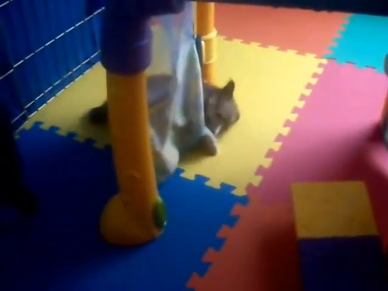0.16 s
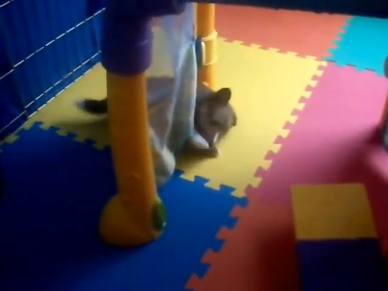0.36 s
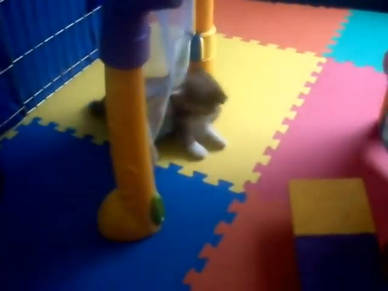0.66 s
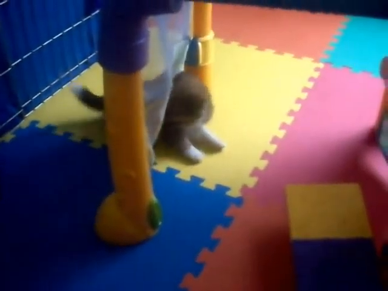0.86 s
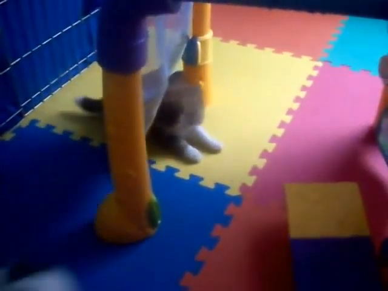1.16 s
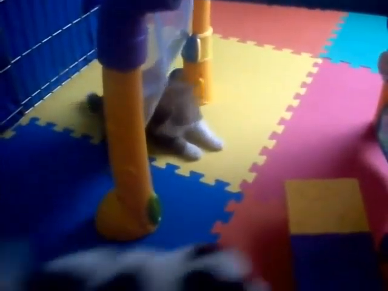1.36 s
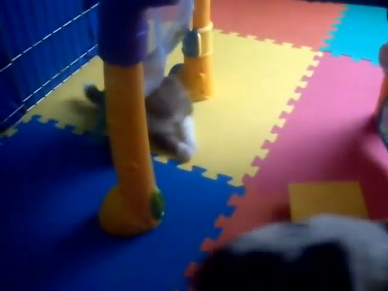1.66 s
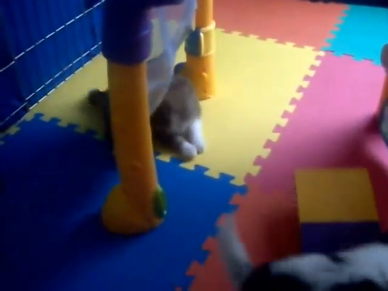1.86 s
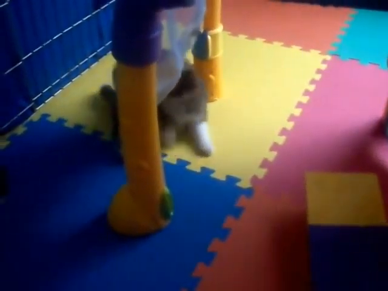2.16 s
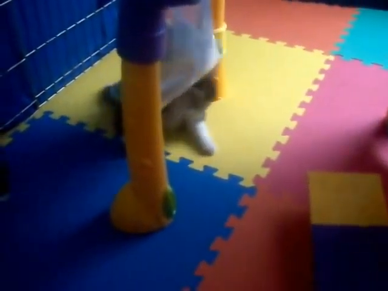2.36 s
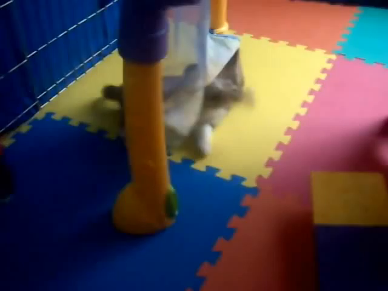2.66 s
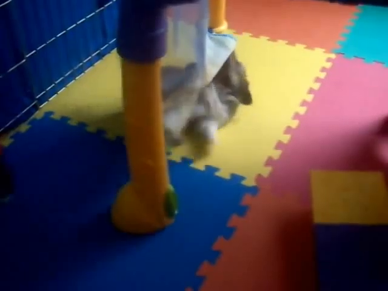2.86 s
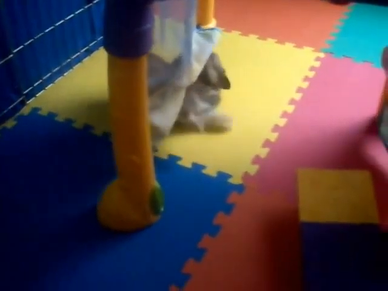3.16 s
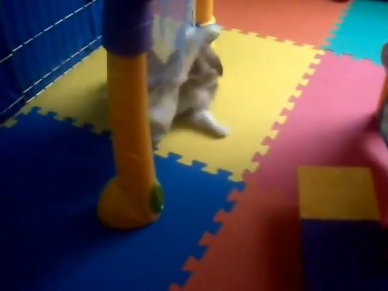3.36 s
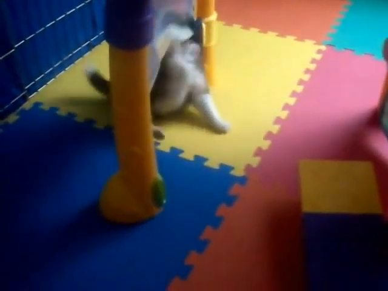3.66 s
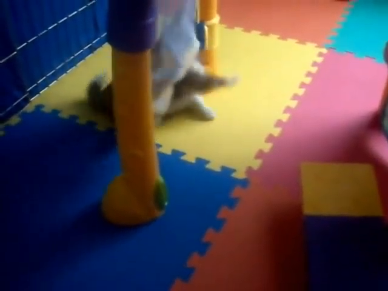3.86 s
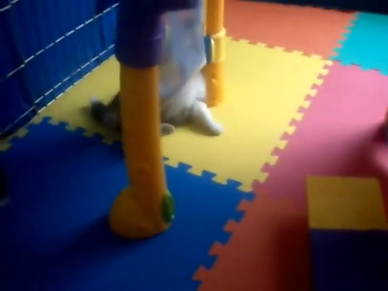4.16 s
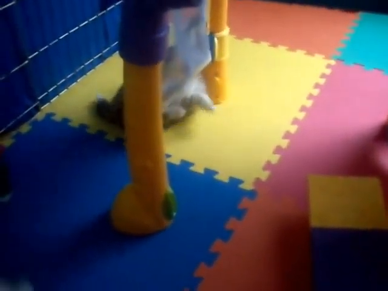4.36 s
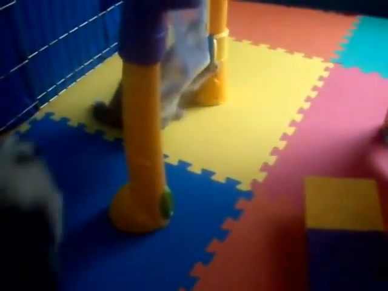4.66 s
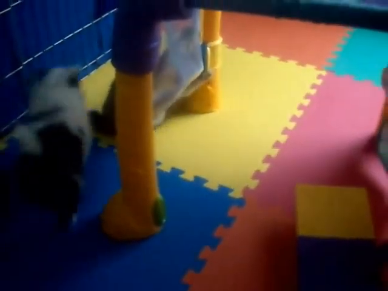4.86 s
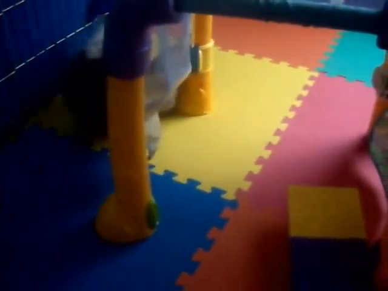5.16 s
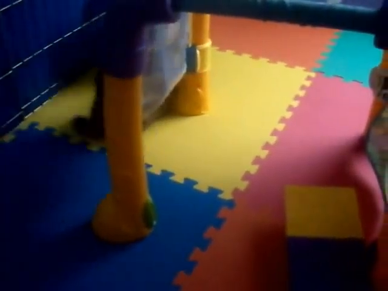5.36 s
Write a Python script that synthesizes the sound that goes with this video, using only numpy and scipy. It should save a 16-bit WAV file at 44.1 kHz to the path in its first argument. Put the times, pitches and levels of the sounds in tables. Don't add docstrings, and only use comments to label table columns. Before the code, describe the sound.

Puppies wrestle on foam mats in a bare, echoing room. Faint rustles and pats lead to a small metal clink and thin squeaks, then a hollow plastic toy is knocked twice, by far the loudest moment. Afterwards paws land, claws tick and scrape, and bodies bump softly. Steady airy hiss and a faint hum stay underneath, through a small camera microphone.

```python
import sys
import numpy as np
from scipy import signal
from scipy.fft import rfft, irfft
from scipy.io import wavfile
from scipy.ndimage import uniform_filter1d

SR = 44100
rng = np.random.default_rng(int(sys.argv[2]) if len(sys.argv) > 2 else 0)


def elevation(decibels):
    levels = np.asarray(decibels, float)
    return 10 ** (levels / 20)


def digitize_waveform(pressure):
    field = np.atleast_2d(pressure).T
    bounded = np.clip(field, -1, 1)
    quanta = np.round(bounded * 32767).astype(np.int16)
    wavfile.write(sys.argv[1], SR, quanta)


N = 242991
T = np.arange(N) / SR
LN_1000 = np.log(1000)
SHORT, LONG = 2000, 4000


def unit(x):
    return x / np.sqrt(np.mean(x ** 2))


def band(x, lo_hz, hi_hz):
    edges_hz = [lo_hz, min(hi_hz, SR / 2.1)]
    return signal.sosfilt(signal.butter(2, edges_hz, "band", fs=SR, output="sos"), x)


def add(out, start_s, x):
    i = max(int(start_s * SR), 0)
    out[i:i + len(x)] += x[:N - i]


def walk(rate_hz):
    hold = int(SR / rate_hz)
    steps = np.resize(np.repeat(rng.standard_normal(SHORT), hold), N)
    return uniform_filter1d(uniform_filter1d(steps, hold), hold)


def swells(strokes):
    t = T[::16]
    power = 0
    for peak_s, db, rise_s, fall_s in strokes:
        away = np.maximum((peak_s - t) / rise_s, (t - peak_s) / fall_s)
        power = power + elevation(2 * db - 40 * away)
    return np.interp(T, t, np.sqrt(power))


# f/Hz, level/dB
AIR = [(12, -24), (22, 2.5), (284, -7.5), (600, -1), (1180, -2), (2250, -9.5), (5810, -16.5),
       (15000, -20.5)]
# f/Hz, width/octaves, level/dB
AIR_DIPS = [(32.2, 0.66, -1.5), (199, 0.31, -8.5), (610, 0.015, -3), (1730, 0.11, -22)]
# f/Hz, level/dB
APPLIANCES = [(120, -98), (240, -80), (642, -72)]


def house():
    hz = np.fft.rfftfreq(N, 1 / SR) + 1
    dips_db = sum(db * np.exp(-(np.log2(hz / f) / width) ** 2) for f, width, db in AIR_DIPS)
    air_hz, air_db = np.transpose(AIR)
    shape = elevation(np.interp(np.log(hz), np.log(air_hz), air_db) + dips_db)
    air = unit(irfft(rfft(rng.standard_normal(N)) * shape, N))
    out = elevation(-63 + 0.32 * walk(1.66)) * air
    for f, db in APPLIANCES:
        out += elevation(db + 2 * walk(12)) * np.sqrt(2) * np.sin(2 * np.pi * f * T)
    return out


# f/Hz, t60/s, level/dB
ECHOES = [(85, 0.35, 2), (236, 0.6, -1), (464, 0.44, 1), (1000, 0.46, 3), (1836, 0.61, -0.5),
          (3700, 0.52, -0.5), (7600, 0.59, -1.5), (14600, 0.65, -3)]


def room(x):
    t = T[:SR]
    tail = np.zeros(SR)
    for hz, t60_s, db in ECHOES:
        noise = band(rng.standard_normal(SR), hz / 1.335, hz * 1.52)
        tail += elevation(db) * noise * np.exp(-LN_1000 * t / t60_s)
    tail *= np.clip((t - .004) / 0.0035, 0, 1)
    return elevation(-3) * signal.fftconvolve(x, tail / np.sqrt(np.sum(tail ** 2)))[:N]


def ring(hz, t60_s, length_s):
    t = np.arange(int(length_s * SR)) / SR
    return np.sin(2 * np.pi * hz * t) * np.exp(-LN_1000 * t / t60_s)


def struck(blows, modes, bursts, slap):
    rings, rest = np.zeros(N), np.zeros(N)
    body = sum((-1) ** k * elevation(db) * ring(hz, t60_s, .6) for k, (hz, db, t60_s) in enumerate(modes))
    slap_hz, slap_db, slap_t60_s, send_db = slap
    smack = ring(slap_hz, slap_t60_s, .02)
    smack = smack * np.minimum(T[:len(smack)] * slap_hz, 1)
    for s, db, contact_ms, crack_db in blows:
        push = np.sin(np.pi * np.arange(0, 1, 1000 / (contact_ms * SR)) + .01)
        push = push / push.sum()
        add(rings, s, elevation(db) * np.convolve(body, push) / 2)
        add(rest, s, elevation(db + slap_db) * np.convolve(smack, push) / 2)
        for (lo_hz, hi_hz, burst_db, fade_ms), extra_db in zip(bursts, (0, crack_db, crack_db)):
            noise = unit(band(rng.standard_normal(SHORT), lo_hz, hi_hz))
            add(rest, s, elevation(db + burst_db + extra_db) * noise * np.exp(-T[:SHORT] * 1000 / fade_ms))
    return np.array([rings + rest, elevation(send_db) * rings + rest])


# t/s, level/dB, contact/ms, crack/dB
PANEL_BLOWS = [
    (3.9945, -44.5, 0.053, -4),
    (3.9965, -35.5, 0.041, -6),
]
# f/Hz, level/dB, t60/s
PANEL_MODES = [(2100, -2, 0.041), (3220, -3, 0.08), (4050, 1, 0.013), (4940, -12, 0.066), (5880, -9, 0.034),
               (8240, 0, 0.012), (9260, -3, 0.018)]
# low f/Hz, high f/Hz, level/dB, fade/ms
PANEL_BURSTS = [(1790, 5700, -10, 3.2), (5050, 12000, -15, 1.9)]
# f/Hz, level/dB, t60/s, ringing sent to room/dB
PANEL_SLAP = (3000, -8, .003, -5)


def wire_panel():
    return struck(PANEL_BLOWS, PANEL_MODES, PANEL_BURSTS, PANEL_SLAP)


# t/s, level/dB, contact/ms, crack/dB
LATCH_BLOWS = [
    (.4014, -29.5, 0.035, -2.5),
]
# f/Hz, level/dB, t60/s
LATCH_MODES = [(1080, -8, .04), (2040, 0, .03), (2800, -2, .008), (3520, -17, .05), (4727, -18, .05),
               (5500, -18, .04), (7200, -15, .03), (8000, -15, .14)]
# low f/Hz, high f/Hz, level/dB, fade/ms
LATCH_BURSTS = [(410, 3200, -19.5, 18), (1890, 9600, -15.5, 8.9), (10980, 15300, -20.5, 12)]
# f/Hz, level/dB, t60/s, ringing sent to room/dB
LATCH_SLAP = (2500, 0, .006, -6)


def metal_latch():
    return struck(LATCH_BLOWS, LATCH_MODES, LATCH_BURSTS, LATCH_SLAP)


# t/s, level/dB, contact/ms, crack/dB
FIRST_KNOCK = [
    (1.8434, -18.5, 0.42, -18),
    (1.8475, -27, 0.95, -23),
    (1.880, -24.5, 0.38, -33),
    (1.8845, -27, 0.47, -20),
    (1.8905, -28, 0.57, -30),
]
SECOND_KNOCK = [
    (2.0214, -24.5, 0.38, -8.5),
    (2.0226, -21, 0.26, -13.5),
    (2.0265, -22.5, 0.4, -27),
    (2.0302, -15, 0.44, -31),
    (2.0395, -34, 0.24, -22),
    (2.050, -24, 0.33, -33),
    (2.083, -26, 0.2, -25),
]
# f/Hz, level/dB, t60/s
FIRST_MODES = [(151, -13, 0.059), (284, -23, 0.11), (333, -6.5, 0.14), (479, -7, .27), (581, 5, 0.041),
               (742, -1.5, 0.057), (875, -0.5, 0.055), (980, -18, 0.1), (1090, -9, 0.086),
               (1340, -6, 0.049), (1463, -2, 0.11), (2030, -10, 0.073), (2470, -1, 0.058),
               (3900, -7, 0.024)]
SECOND_MODES = [(90, -14.5, 0.067), (267, -12, 0.036), (326, -13, 0.16), (479, -13, .36), (587, -19, 0.051),
                (790, 3.5, 0.022), (885, -1.5, 0.066), (1060, -4, 0.037), (1180, 5.5, 0.024),
                (1300, -3.5, 0.039), (1501, -3, 0.12), (1818, -14, 0.041), (2070, -11, 0.06),
                (2400, -1.5, 0.017)]
# low f/Hz, high f/Hz, level/dB, fade/ms
FIRST_BURSTS = [(260, 1450, -8, 6.1), (1600, 5400, -2.5, 4.4), (9100, 18000, -17, 3.9)]
SECOND_BURSTS = [(392, 1170, -6, 4.8), (1590, 3400, -4, 3.9), (8000, 19000, -18, 5)]
# f/Hz, level/dB, t60/s, ringing sent to room/dB
FIRST_SLAP = (820, 18, .0055, -5)
SECOND_SLAP = (900, 12.5, .006, -4)


def hollow_toy():
    first = struck(FIRST_KNOCK, FIRST_MODES, FIRST_BURSTS, FIRST_SLAP)
    second = struck(SECOND_KNOCK, SECOND_MODES, SECOND_BURSTS, SECOND_SLAP)
    return band(first + second, 100, 18000)


# t/s, length/s, first f/Hz, last f/Hz, level/dB
PAD_SQUEAKS = [
    (-.03, 0.13, 2370, 2390, -65),
    (0.797, 0.038, 2325, 2335, -63.5),
    (0.835, 0.075, 2380, 2560, -65),
    (0.895, 0.085, 2550, 2565, -57.5),
]


def squeaks():
    out = np.zeros(N)
    roughness = .35
    for s, length_s, first_hz, last_hz, db in PAD_SQUEAKS:
        way = np.clip((T - s) / length_s, 0, 1)
        glide_hz = first_hz + (last_hz - first_hz) * way
        turns = np.cumsum(glide_hz * (1 + .003 * walk(68))) / SR
        grip = 1 - roughness / 2 + roughness * walk(206)
        level = elevation(db + 2.5 * walk(50.5)) * grip * np.sin(np.pi * way)
        out += level * np.sqrt(2) * np.sin(2 * np.pi * turns)
    return out


# t/s, length/s, f/Hz, level/dB
PAD_RASPS = [
    (0.872, 0.038, 2860, -61),
    (3.256, 0.046, 2450, -64),
    (2.291, 0.045, 2340, -59),
    (2.344, 0.12, 2390, -61),
    (3.349, 0.08, 770, -59),
]


def rasps():
    out = np.zeros(N)
    half_width_hz = 170
    for s, length_s, hz, db in PAD_RASPS:
        way = np.arange(0, 1, 1 / (length_s * SR))
        hiss = unit(band(rng.standard_normal(SR // 4), hz - half_width_hz, hz + half_width_hz))
        add(out, s, elevation(db) * np.sqrt(np.sin(np.pi * way)) * hiss[:len(way)])
    return out


def slip_grain():
    slips_per_s, spread_db = 3000, 3
    slips = (rng.random(N) < slips_per_s / SR) * elevation(spread_db * rng.standard_normal(N))
    return np.convolve(slips, np.exp(-T[:SHORT // 4] / .003))[:N]


def rubbing(grain, size, lo_hz, hi_hz):
    noise = band(grain * rng.standard_normal(N), lo_hz, hi_hz)
    noise = band(noise, lo_hz / 1.74, hi_hz * 1.2)
    return size * elevation(2.2 * walk(14)) * unit(noise)


# peak t/s, level/dB, rise/s, fall/s
FUR_STROKES = [(.05, -65, .5, 0.39), (.28, -65, 0.11, .16), (.385, -64, 0.065, 0.33),
               (.944, -69.5, 0.29, .06), (1.014, -66.5, .03, 0.26), (1.182, -65.5, .03, 1),
               (1.474, -62, .02, 0.048), (1.734, -60.5, 0.19, 0.18), (1.846, -54, .004, .05),
               (1.866, -49.5, .004, 0.045), (1.885, -53, .012, 0.059), (2.26, -63.5, 0.16, 0.083),
               (2.587, -55, .01, .02), (2.71, -61, .08, 0.11), (2.784, -54, .003, 0.014),
               (2.915, -63, .02, .02), (3.919, -55.5, .01, .025), (3.958, -55, .012, .02),
               (3.997, -54, .003, .012), (4.077, -60, .01, .02), (2.41, -66, 0.031, 0.95),
               (2.63, -57.5, 0.38, 0.35), (3.28, -65, 0.12, .2), (3.52, -63, 0.034, 0.37),
               (3.67, -58.5, 0.21, 0.099), (3.99, -63, 0.39, 0.2), (4.22, -60.5, 0.03, 0.11),
               (4.61, -65, 1.1, 0.26), (4.83, -63, 0.036, 0.051), (5.15, -66, 0.027, 0.076)]
# low f/Hz, high f/Hz, level/dB
CLOTH_NAP = (7360, 9460, -7.5)


def fur_and_cloth(grain):
    stroke = swells(FUR_STROKES)
    lo_hz, hi_hz, nap_db = CLOTH_NAP
    nap = rubbing(grain, stroke * elevation(nap_db), lo_hz, hi_hz)
    return nap + rubbing(grain, stroke, lo_hz=2780, hi_hz=15300)


# peak t/s, level/dB, rise/s, fall/s
BODY_SHOVES = [
    (.43, -51, 0.021, 0.24),
    (1.28, -58, .08, 0.14),
    (2.59, -53, 0.012, 0.21),
    (3.92, -58, 0.055, 0.17),
    (4.46, -65, 0.022, 0.13),
    (4.77, -61, 0.026, 0.16),
    (2.71, -53, 0.037, 0.063),
    (2.80, -59, 0.031, .15),
    (5.31, -63, .008, 0.12),
]
# peak t/s, level/dB, rise/s, fall/s
CLAW_DRAGS = [
    (1.175, -58, 0.0071, 0.14),
    (1.72, -71, 0.055, 0.15),
    (2.605, -62, 0.045, 0.28),
    (2.80, -67, .05, 0.18),
    (2.9, -65, 0.028, 0.092),
    (3.265, -62.5, .012, 0.13),
    (3.6, -58.5, 0.092, 0.26),
    (3.925, -56.5, 0.044, 0.3),
    (4.25, -55.5, 0.13, 0.11),
    (4.38, -67, 0.043, 0.22),
]
# t/s, effort/dB, claws out/dB
EFFORT = [(0, -57, -0.5), (.31, -75.5, 13), (.42, -71, 14), (.75, -64.5, -8), (1.05, -63.5, 4.5),
          (1.26, -59, -3), (1.44, -63, -7), (1.68, -64, 2.5), (1.83, -76, 15), (2.4, -58, -5),
          (2.66, -64, 1.5), (2.85, -54, -27), (3.04, -63, -5), (3.37, -72, 4), (3.55, -59.5, -14),
          (4.1, -66.5, 3.5), (4.6, -59, -8.5), (4.9, -65.5, -3)]


def wrestling(grain):
    s, effort_db, claws_db = np.transpose(EFFORT)
    effort_db, claws_db = np.interp(T, s, effort_db), np.interp(T, s, claws_db)
    weight = elevation(-73.5 + 0.19 * (effort_db + 55))
    rumble = rubbing(grain, weight, lo_hz=57.4, hi_hz=367)
    scuff = rubbing(grain, elevation(effort_db) + swells(BODY_SHOVES), lo_hz=394, hi_hz=1485)
    scrape = rubbing(grain, elevation(effort_db + claws_db) + swells(CLAW_DRAGS), lo_hz=1850, hi_hz=2910)
    return rumble + scuff + scrape


def contacts(rows, ring_ms, spread, tone, noisy):
    near, far, t = np.zeros(N), np.zeros(N), T[:LONG]
    fade = np.exp(-LN_1000 * t * 1000 / ring_ms)
    for s, db, hz, wet_db in rows:
        shape = elevation(db) * fade * np.minimum(t * hz / .9, 1)
        puff = unit(band(rng.standard_normal(LONG), hz / spread, hz * spread))
        dent = tone * np.sin(2 * np.pi * hz * t)
        add(near, s, shape * (dent + noisy * band(puff, hz / spread, hz * spread)))
        add(far, s, shape * puff * elevation(wet_db))
    return np.array([near, far])


# t/s, level/dB, f/Hz, room share/dB
FLOOR_BOOMS = [
    (1.86, -42, 80.5, -3),
    (2.05, -49.5, 86, -3),
    (2.10, -45, 90, -12.5),
    (2.69, -62.5, 74, 0),
    (4.05, -66, 75, -8),
]


def booms():
    return contacts(FLOOR_BOOMS, ring_ms=174, spread=1.18, tone=1.0, noisy=0.4)


# t/s, level/dB, f/Hz, room share/dB
CLAW_TICKS = [(0.8185, -47.5, 2730, -6), (0.8797, -61, 2730, -6), (.928, -46.5, 1700, -15),
              (1.174, -50, 2180, -12), (1.1847, -38.5, 2150, -11), (1.1956, -44, 2070, -16),
              (1.4097, -52, 2100, -2.5), (1.593, -53, 2100, 2), (1.7015, -43, 1850, -2.5),
              (2.2964, -41.5, 2240, -24), (2.5855, -45, 2640, -1.5), (2.602, -46, 2310, -21),
              (2.7673, -50, 2460, 9), (2.8943, -42.5, 2260, -2.5), (3.257, -52, 2400, -6),
              (3.268, -46.5, 2400, -6), (3.509, -47, 2200, -3.5), (3.5806, -50, 2130, 5),
              (3.9211, -48.5, 2210, -3.5), (4.067, -42, 2400, -27), (4.2449, -54, 2470, -2),
              (4.3584, -50, 2000, -0.5), (4.3811, -49, 1960, -14), (4.7466, -52, 2750, -14),
              (4.8149, -47, 2580, -12)]
CLAW_SNAPS = [(0.012, -63.5, 3960, 6.5), (0.189, -62, 3480, -13), (0.2498, -53, 3900, -6),
              (0.7165, -49.5, 3400, -17), (0.818, -55, 3740, -12), (1.008, -52.5, 3720, -9),
              (1.0191, -48.5, 3520, -13), (1.119, -52.5, 3700, -16), (1.174, -53.5, 4560, 4.5),
              (1.4083, -54, 3440, -9), (1.4743, -49, 3720, -12), (1.535, -56, 3560, -14),
              (1.637, -54.5, 4470, -13), (1.722, -54, 4160, 2), (2.2194, -55.5, 3630, -4),
              (2.2556, -55, 5330, -34), (2.5855, -53, 9000, -17), (2.7835, -52, 5700, -22),
              (3.0405, -56, 3720, -8), (3.21, -60, 4000, -19), (3.257, -60, 8450, -14),
              (3.2842, -53.5, 7000, -8), (3.3837, -54.5, 4050, -21), (3.5784, -64, 8200, 6),
              (3.738, -56.5, 4200, -17), (3.9178, -53, 6060, -2.5), (3.9594, -51, 4040, -5),
              (4.0683, -47, 3900, -20), (4.2086, -53.5, 8000, -10), (4.2996, -55.5, 4000, -16),
              (4.358, -54.5, 4100, -4), (4.4434, -47, 3800, -9), (4.5294, -52, 3950, -15),
              (4.545, -63, 3800, -12), (4.685, -58, 3960, -17), (4.7232, -58, 3520, -19),
              (4.837, -54, 3860, -18), (4.9891, -53.5, 3360, -27)]


def claws():
    ticks = contacts(CLAW_TICKS, ring_ms=14.5, spread=1.47, tone=0.7, noisy=0.92)
    return ticks + contacts(CLAW_SNAPS, ring_ms=24.3, spread=1.23, tone=0.31, noisy=0.81)


# t/s, level/dB, f/Hz, room share/dB
CLOSE_TAPS = [(1.4715, -44, 950, 0), (2.5865, -38, 750, 0), (3.5095, -46, 700, 0), (3.907, -43, 900, 0),
              (4.075, -43, 1150, 0), (4.3595, -42, 1000, 0), (4.7465, -40, 1200, 0), (4.99, -44, 1000, 0),
              (5.2555, -46, 950, 0), (5.307, -43, 900, 0), (5.313, -48, 800, 0), (5.471, -50, 900, 0)]


def taps():
    return contacts(CLOSE_TAPS, ring_ms=9.9, spread=2.8, tone=0.73, noisy=0.4)[0]


# t/s, level/dB, f/Hz, room share/dB
TOE_PATS = [(0.013, -51.5, 1290, 2.5), (0.275, -41.5, 1180, -6.5), (1.117, -45.5, 1090, -8.5),
            (1.289, -47.5, 1150, -10), (1.472, -44.5, 1000, -12.5), (1.636, -46, 1230, -8),
            (1.701, -45, 890, -6.5), (2.297, -44.5, 856, -12), (2.619, -50, 1000, -3.5),
            (2.704, -47.5, 1100, -0.5), (2.790, -38.5, 1200, -3), (2.829, -43, 1240, -7),
            (2.919, -47, 1300, -16), (2.996, -42, 1230, -14), (3.510, -44.5, 835, -12.5),
            (3.949, -50, 1440, -8), (3.994, -46, 875, -0.5), (4.0685, -39, 1140, -6.5),
            (4.098, -44, 1040, -26), (4.362, -51, 1220, 0.5), (4.747, -42, 1250, -15),
            (4.99, -56, 930, -18), (5.0415, -46, 940, -16), (5.192, -50.5, 1300, -5.5),
            (5.2545, -52, 920, -19), (5.3065, -47, 1000, -16), (5.47, -55, 970, -10)]
PAW_LANDINGS = [(0.7175, -41, 780, -13), (0.819, -59, 615, -4), (0.925, -46, 704, -14),
                (1.249, -57, 620, -12), (2.586, -36.5, 607, -2), (3.353, -40, 735, -15),
                (3.739, -38, 700, -28), (3.909, -31, 614, -8.5), (4.394, -41, 600, -15),
                (4.4425, -32, 616, -9), (4.494, -45, 622, -13), (4.685, -33.5, 850, -12.5),
                (4.724, -35.5, 534, -4.5), (4.754, -40, 560, -2), (4.779, -44, 690, -19),
                (5.349, -57, 770, -8)]
BODY_THUMPS = [
    (1.641, -56, 178, -6),
    (2.429, -60, 164, -14),
    (2.701, -43, 367, -3.5),
    (2.787, -39, 374, -5),
    (2.825, -45.5, 546, -4),
    (2.986, -45, 380, -8.5),
    (3.899, -53, 160, -9),
    (4.062, -56.5, 240, -7),
    (4.358, -57.5, 257, -9.5),
    (4.994, -61, 254, -2),
]


def paws_and_bodies():
    pats = contacts(TOE_PATS, ring_ms=31.3, spread=1.53, tone=0.95, noisy=0.49)
    landings = contacts(PAW_LANDINGS, ring_ms=14.9, spread=1.52, tone=0.45, noisy=0.99)
    thumps = contacts(BODY_THUMPS, ring_ms=68, spread=2.14, tone=0.77, noisy=0.91)
    return pats + landings + thumps


def scene():
    near, far = paws_and_bodies() + claws() + booms()
    toy, latch, panel = hollow_toy(), metal_latch(), wire_panel()
    grain = slip_grain()
    rub = elevation(-3.5) * (wrestling(grain) + fur_and_cloth(grain)) + squeaks() + rasps()
    hits_send = elevation(0.9) * toy[1] + elevation(8.5) * latch[1] + elevation(1.5) * panel[1]
    echoes = room(hits_send + elevation(8.5) * far + elevation(-12.5) * rub)
    direct = toy[0] + latch[0] + panel[0] + near + rub + taps()
    return (direct + echoes + house())[None]


# f/Hz, width/Hz, share added
HOUSING = [(1720, 540, -0.16), (2530, 210, -0.12), (3100, 650, -0.29)]


def microphone(x):
    for hz, width_hz, share in HOUSING:
        x = x + share * signal.lfilter(*signal.iirpeak(hz, hz / width_hz, SR), x)
    return x


def top_cut(x):
    return signal.sosfilt(signal.butter(12, 16050, fs=SR, output="sos"), x)


def record(dry):
    top_hz = 15480
    steep = signal.ellip(10, .2, 70, top_hz, fs=SR, output="sos")
    mix = signal.sosfilt(steep, microphone(dry))
    return top_cut(mix)


dry = scene()
out = record(dry)
digitize_waveform(out)
```